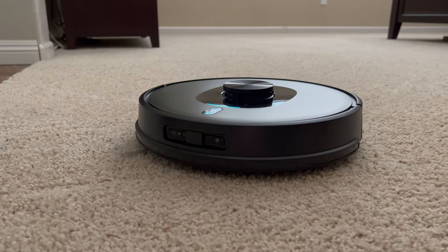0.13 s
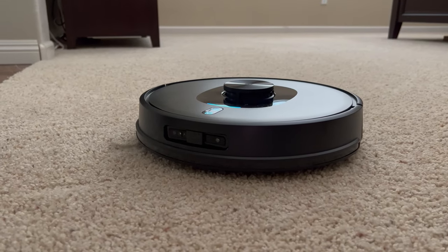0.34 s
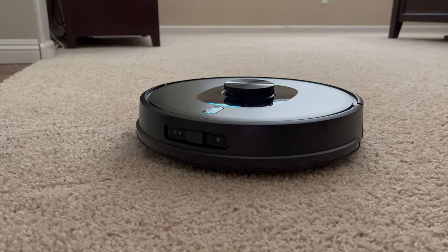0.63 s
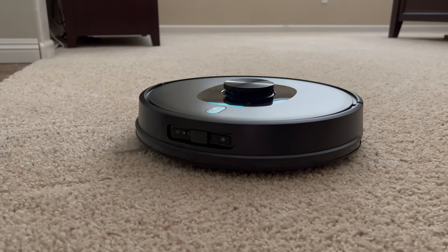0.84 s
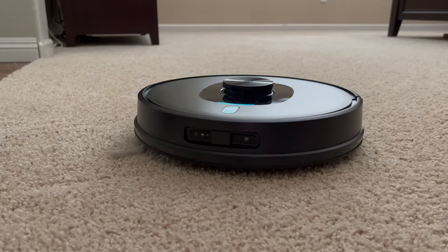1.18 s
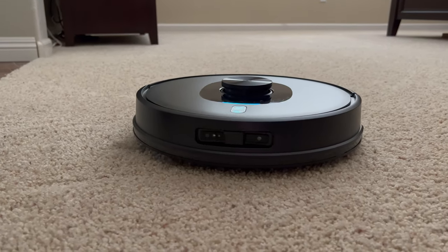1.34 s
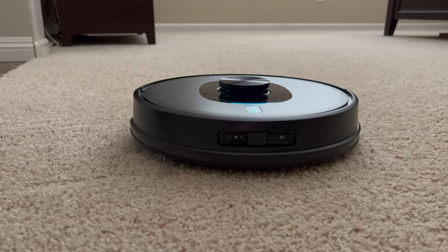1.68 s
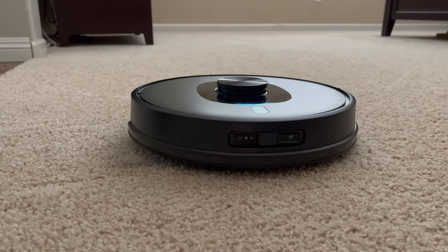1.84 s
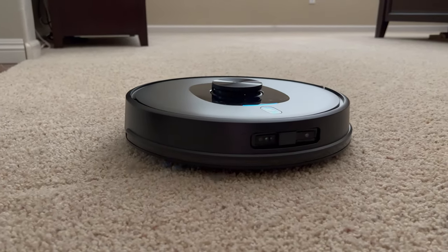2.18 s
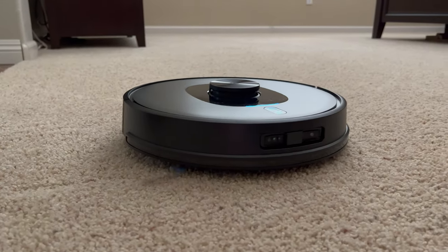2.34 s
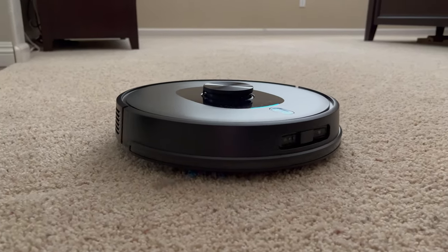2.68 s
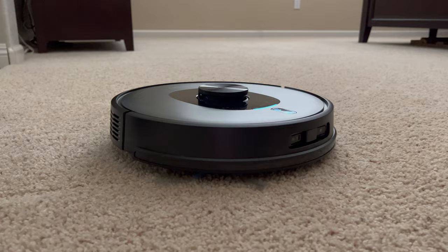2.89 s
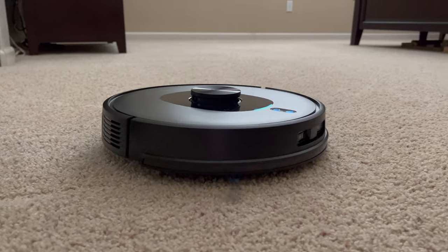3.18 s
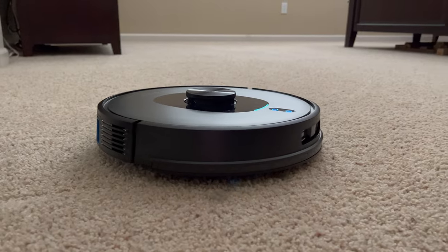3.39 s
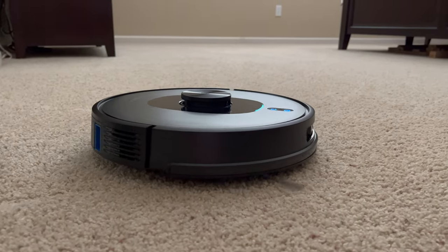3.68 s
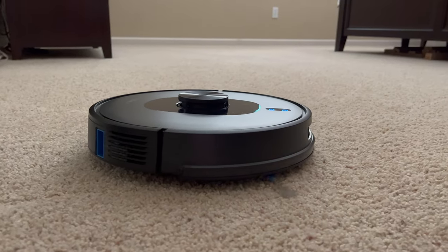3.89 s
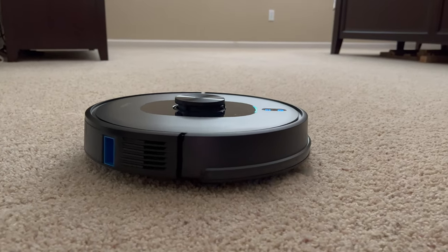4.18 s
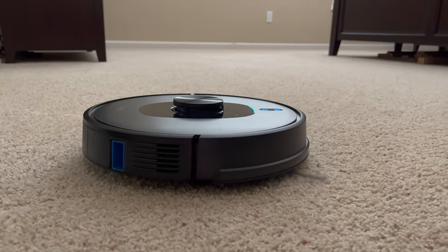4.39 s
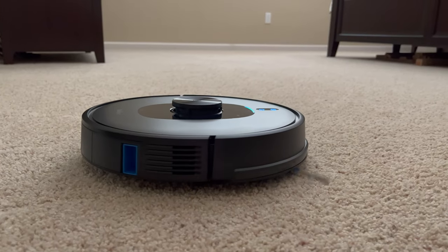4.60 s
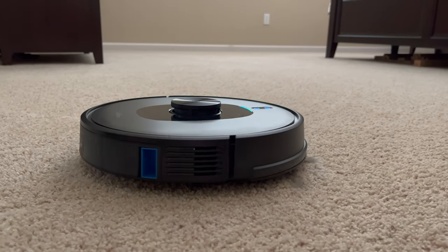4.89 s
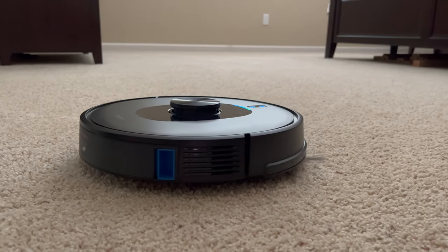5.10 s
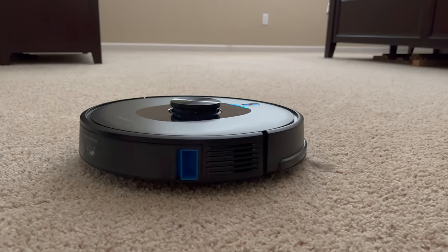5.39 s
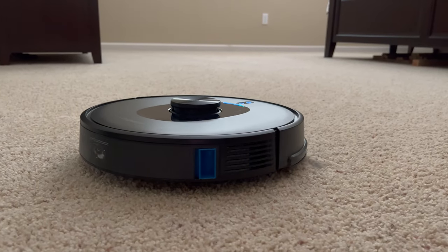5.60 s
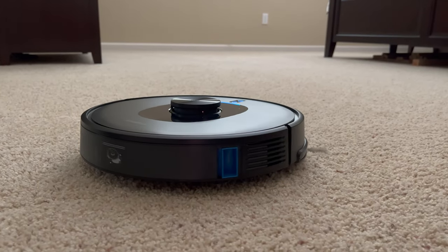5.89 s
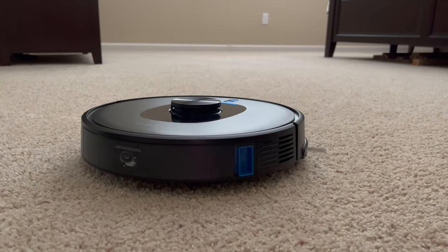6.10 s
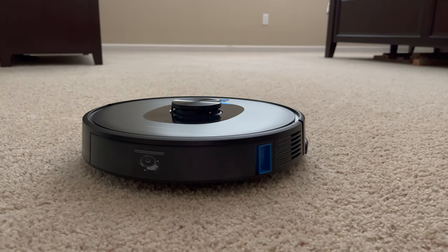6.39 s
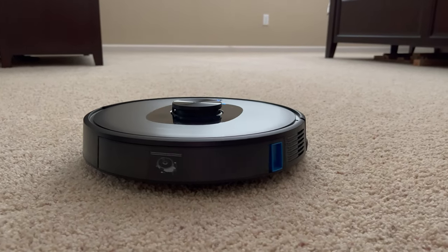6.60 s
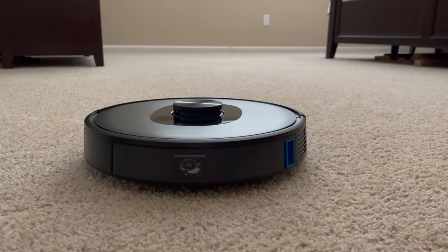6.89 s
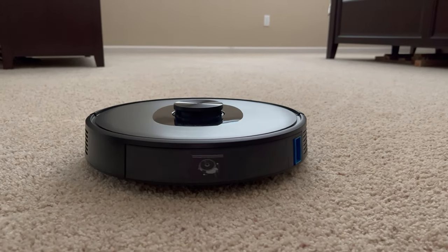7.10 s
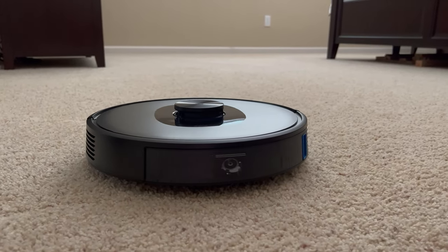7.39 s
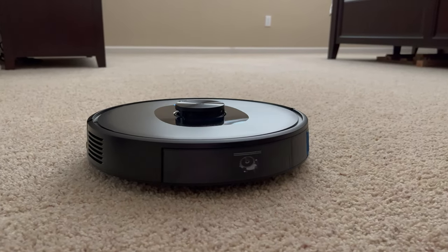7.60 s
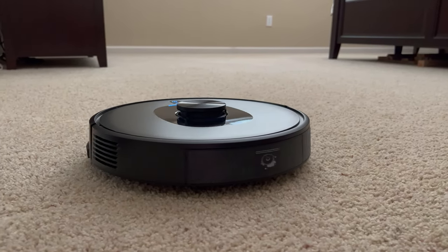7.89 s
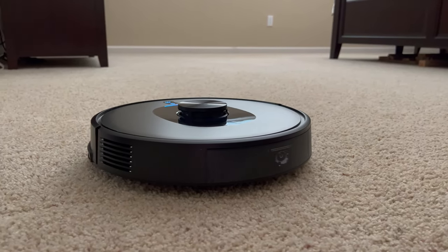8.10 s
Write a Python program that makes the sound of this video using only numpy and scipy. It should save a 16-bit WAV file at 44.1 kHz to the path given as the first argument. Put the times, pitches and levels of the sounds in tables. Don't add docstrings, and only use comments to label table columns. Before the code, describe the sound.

Close stereo pickup of a small vacuum spinning slowly on the spot indoors. Its fan makes constant breathy noise over a low rumbling hum, with a clear high whine near two and a half kilohertz and a fainter octave above. Level stays nearly even at first, the whine wavering subtly, then the airflow becomes fuller and brighter in the last two seconds. No bumps, clicks or stops.

```python
import sys
import numpy as np
from scipy import signal
from scipy.fft import rfft, irfft
from scipy.io import wavfile

SR = 44100
rng = np.random.default_rng(int(sys.argv[2]) if len(sys.argv) > 2 else 0)


def to_wav(s):
    ch = np.atleast_2d(s).T
    pcm = np.round(np.clip(ch, -1, 1) * 32767)
    wavfile.write(sys.argv[1], SR, pcm.astype(np.int16))


def how_loud(loudness_db):
    steps = np.asarray(loudness_db, float) / 20
    return 10 ** steps


N = 363825
HZ = np.fft.rfftfreq(N, 1 / SR) + 1e-3
STEPS = np.arange(0, N + 64, 64)

TURN_START_S, TURN_DEG_PER_S = .9, 37.5
BLADES = 8
HUM_DB = -36
CAVITY_HZ, CAVITY_SAG_HZ = 2417, 280
SAG_AT_DEG, SAG_WIDTH_DEG = 195, 28
ECHO_CUT_HZ = 2000
TOP_HZ = 9550
SHADOW_HZ = 1300
SCATTER_FROM_HZ, SCATTER_RISE_HZ = 190, 120
WALL_FRAMES = 3
FINE_WIDTH, TWIST_WIDTH, BROAD_WIDTH, AWAY_WIDTH = 2.5, 3, 8, 15

# mean, once a turn, at/deg, twice a turn, at/deg
# early path delay after the left direct sound, values in ms
LAGS_MS = [
    (1.3, .24, 0, 0, 0),
    (.026, .117, -143, .068, -87),
    (.022, .23, -160, .046, 89),
    (.43, 0, 0, 0, 0),
    (.824, .079, 151, .042, 3),
    (2.022, .15, -83, .06, -37),
    (2.41, .15, -83, .06, -37),
]
PATH_GAINS = [
    (.55, .08, -120, 0, 0),
    (.68, .33, 70, .15, -20),
    (.16, .12, -170, .1, -5),
    (.6, .38, -125, .08, -21),
    (.25, .15, -168, .15, 3),
    (.45, .15, -140, .05, 62),
    (.22, .25, -140, 0, 0),
]
PAN_DB = (-6, 3, -165, 0.5, 66)
LOW_PAN_DB = (-1, 0.5, 80, 1, -2)
FAN_PER_S = (323.1, .14, 170, 0, 0)

# f/Hz, level/dB
HUM_SPECTRUM = [(13, -57), (22, -38), (48, -12.5), (97, -8.5), (171, 0), (221, -1), (249, -7), (325, -8.5),
                (367, -41.5), (400, -44), (520, -14), (880, -120)]
CASING_SPECTRUM = [(190, -67), (330, -15), (368, -14), (541, -1), (759, -25.5), (1150, -13.5), (1910, -13),
                   (2490, -8.5), (3900, -14), (4830, -19.5), (8160, -22), (10500, -29), (12000, -28),
                   (15700, -28)]
INTAKE_SPECTRUM = [(2600, -5), (3000, 8), (3500, -35), (4000, 20.5), (4400, 3), (5000, 7.5), (5600, -5),
                   (6300, 8), (7400, -67), (8200, -47), (9000, 5), (10200, -20), (12200, 4.5), (15700, -13)]
VENT_SPECTRUM = [(300, -39), (560, 0.5), (760, -1), (1200, -3.5), (1450, 6.5), (1650, -1), (2000, 6),
                 (2600, -8.5), (2900, -7.5), (6900, -11), (8140, -16), (9600, -14.5), (12000, -23.5),
                 (15700, -17.5)]
JET_SPECTRUM = [(6000, -33), (8000, 11), (10000, -5), (12200, 9), (15700, -16)]
# f/Hz, level/dB
DIFFUSE = [(60, -21), (200, -12), (500, -7), (2000, -6.5), (6000, -3.5), (9300, -3), (10300, -11),
           (11500, -17), (15700, -16)]
# f/Hz, width/Hz, lift/dB
ROOM_MODES = [(57.4, 13, 6), (83, 9.5, 3), (158, 9.5, 3), (179.4, 3.5, 6), (227.3, 25, 4), (273, 7.5, 10),
              (347.8, 7.3, 23)]
GRILLE = [(3670, 150, -16), (4535, 63, 7.5), (5500, 480, 7), (7370, 250, -12)]
TOP_DIPS = [(9650, 200, -4), (10400, 900, -5), (14600, 2600, -5)]

SHELL_MS = [.49, .59, .67, .93, 1.07, 1.42, 1.96, 2.68]
SHELL_GAIN = [
    (.1, -0.15, 0.029, 0.0026, -0.072, -0.057, 0.11, -0.27),
    (.15, -0.18, 0.0097, -0.067, -0.015, -0.091, 0.0059, 0.014),
]
# f/Hz, phase/rad
TOP_PHASE = [(9500, -3.0), (10000, -2.7), (10400, -2.0), (10900, -.9), (11900, 0), (12800, .85),
             (13500, 2.05), (14300, 3.14), (15000, 3.5), (15700, 4.45)]

# heading/deg, half width/deg, level/dB
CASING_BEAMS = [(0, 65, -46.5), (150, 1100, -38.5)]
VENT_BEAMS = [(177, 21, -43.5), (260.6, 34.7, -33)]
CAVITY_BEAMS = [(5, 63, -33.5), (101.5, 14, -36), (215, 11, -33.5), (284.5, 27.4, -26)]
DUCT_BEAMS = [(0, 102, -42.5), (172, 39, -41.5), (250, 34, -35)]
INTAKE_BEAMS = [(0, 30, -42.5), (151, 9.1, -49.5)]
JET_BEAMS = [(297, 31, -37)]
FAINT_BEAMS = [(0, 30, 1), (120, 200, -1), (265, 30, 5)]
BLADE_BEAMS = [
    [(5, 18, -53), (84, 17, -55.5), (141, 12, -53.5), (190, 25, -65), (247, 20, -47)],
    [(0, 9, -53), (60, 16, -52), (105, 25, -46.5), (168, 16, -53.5), (228, 12, -48), (262, 22, -46.5)],
]
OCTAVE_BEAMS = [
    [(100, 300, -72), (255, 24, -61)],
    [(0, 12, -55.5), (34, 10, -58.5), (68, 14, -63), (115, 12, -64), (139, 5, -55), (175, 20, -64),
     (220, 15, -58), (258, 28, -52.5)],
]
SHAFT_BEAMS = [
    [(110, 120, -65)],
    [(87, 81, -56.5), (266, 28, -58)],
]
SIXTH_BEAMS = [
    [(120, 200, -66), (240, 14, -51)],
    [(0, 14, -53), (120, 200, -64), (255, 25, -48)],
]
SEVENTH_BEAMS = [
    [(0, 200, -58)],
    [(10, 22, -42), (190, 100, -56)],
]
LEADS = [
    [(0, 2.2), (15, 2.3), (34, 5.1), (65, 5.5), (90, 6.3), (110, 6.3), (135, 7.9), (160, 7.2), (190, 8.8),
     (211, 7.3), (232, 8.3), (265, 7.8)],
    [(0, 1.4), (34, .5), (55, -2), (75, -5), (100, -3.5), (128, -1.7), (140, 0), (157, 2), (172, 4.5),
     (201, 3.4), (243, 0), (264, -1.1)],
]
# multiple of fan speed [1], level/dB
FAINT_ORDERS = [(2, -67), (17, -73), (24, -71.5)]

# heading/deg, half width/deg, f/Hz, slide/(Hz/deg),
# lift/dB
FINE_FRINGES_LEFT = [(51, 45, 470, 1.1, -2.0), (161, 25, 590, -2.0, -4.3), (-1, 49, 780, -2.2, 3.7),
                     (18, 48, 1020, -2.7, -2.7), (106, 30, 1280, 4.0, 5.7), (36, 30, 1290, 1.6, -4.5),
                     (189, 29, 1300, -0.9, -4.3), (243, 23, 1450, 0.4, 3.5), (1, 150, 1520, -1.5, 1.7),
                     (110, 35, 1670, 1.5, -3.5), (242, 28, 1690, -2.7, -3.2), (258, 23, 1860, -2.3, 3.9),
                     (277, 39, 2000, -1.7, -5.4), (20, 29, 2120, -1.3, -3.3), (246, 24, 2170, -5.4, -4.5),
                     (-1, 34, 2370, -2.9, 2.2), (0, 46, 2410, -2.6, 1.5), (109, 23, 2620, 1.6, -5.1),
                     (41, 28, 3100, -2.0, -3.3), (274, 27, 3150, 1.0, -2.0), (254, 13, 3160, -0.2, -4.4),
                     (76, 27, 3280, -5.3, 3.5), (280, 16, 3640, -2.2, 3.4), (190, 48, 3740, 2.6, -3.6),
                     (32, 150, 4120, 0.6, -3.8), (-1, 64, 4560, 2.9, 3.2), (265, 16, 4930, 6.8, 3.5),
                     (248, 66, 5450, 0.9, -5.0), (-1, 19, 5890, 5.5, 3.0), (-1, 16, 6980, 5.6, 3.4),
                     (280, 12, 7130, 12.0, 6.0), (220, 92, 7250, 0.0, 4.0), (-1, 16, 7980, 9.5, 2.3),
                     (-1, 110, 8230, -1.0, 3.2), (172, 71, 8640, -4.1, -2.9), (227, 93, 8840, 0.1, -4.9),
                     (10, 16, 9300, -10.0, 3.0),
                     (275, 14, 6373, 0, 4), (188, 25, 4866, 0, 3.5), (188, 15, 2282, 0, 3),
                    (200, 32, 1162, 0, 2.5), (45, 22, 2583, 0, -3), (200, 25, 660, 0, 2)]
FINE_FRINGES_RIGHT = [(280, 67, 420, -2.5, 3.0), (-1, 67, 470, -0.1, 4.0), (75, 97, 580, -0.8, -4.4),
                      (280, 108, 650, 1.3, -3.1), (267, 14, 680, -0.0, -4.7), (73, 76, 730, -0.4, 2.1),
                      (-1, 17, 750, -0.9, 3.1), (124, 29, 780, -2.3, 6.6), (265, 14, 910, 1.7, 4.7),
                      (111, 130, 1140, 1.3, -3.9), (-1, 12, 1150, 1.5, 2.0), (105, 31, 1300, -0.1, 4.2),
                      (204, 39, 1560, -1.3, 7.7), (280, 60, 1770, 8.2, 3.7), (207, 56, 1850, -3.0, -7.5),
                      (-1, 16, 1930, 10.0, 2.0), (220, 41, 2190, -3.9, 7.9), (83, 54, 2210, 0.4, -2.6),
                      (260, 20, 2260, -3.0, -4.5), (108, 29, 2420, -0.6, 3.0), (85, 109, 2860, -3.2, -2.5),
                      (246, 32, 2990, -4.9, -4.5), (57, 68, 3410, -0.6, 2.0), (132, 59, 3670, -0.5, -3.0),
                      (-1, 16, 3810, -0.4, 3.2), (278, 63, 4010, 4.7, -4.1), (77, 19, 4030, 1.2, 5.0),
                      (65, 61, 4480, 6.0, -4.4), (-1, 13, 4580, -3.5, 4.7), (186, 21, 4740, -3.7, 4.4),
                      (236, 148, 5150, -3.6, 3.0), (273, 19, 5790, -9.0, -3.5), (280, 51, 6790, 3.6, -5.8),
                      (225, 24, 7300, -3.8, 4.8), (-1, 145, 7490, 1.1, -2.8), (-1, 12, 8860, 1.0, -3.8),
                      (210, 42, 9300, 2.3, 3.3),
                      (38, 20, 5469, 0, -4), (275, 18, 8096, 0, -4.5), (102, 18, 4349, 0, -3.5),
                     (118, 22, 1851, 0, 3), (22, 18, 2600, 0, -4), (5, 30, 2760, 0, 3.5)]
BROAD_LOBES_LEFT = [(228, 66, 380, 0.7, 2.4), (99, 27, 620, 0.3, 4.9), (256, 34, 1430, -9.9, -6.6),
                    (-1, 14, 1970, -6.2, 5.1), (99, 40, 2110, 0.1, 4.1), (280, 41, 3270, 7.5, 6.2),
                    (58, 62, 3270, -1.2, 3.0), (-1, 47, 3540, 8.6, 2.3), (56, 71, 5640, -5.9, 1.3),
                    (209, 55, 6100, 0.6, -2.3), (-1, 70, 7380, -12.0, 4.2), (184, 19, 9500, 12.0, 2.7)]
BROAD_LOBES_RIGHT = [(-1, 150, 400, -9.6, 1.5), (239, 36, 730, 1.0, -6.9), (-1, 90, 760, 0.8, 6.1),
                     (-1, 12, 1070, -12.0, 1.9), (147, 31, 1550, 0.7, 4.7), (244, 30, 1640, -5.1, -3.5),
                     (41, 26, 1910, -6.7, -1.9), (-1, 12, 2630, 8.0, 2.9), (208, 18, 7420, 12.0, 3.8),
                     (59, 46, 7570, 5.1, -4.7), (184, 21, 8100, 12.0, -2.8), (-1, 12, 8290, 12.0, 2.0),
                     (-1, 17, 9040, 2.7, 1.7)]
FINE_FRINGES_BOTH = [(85, 35, 15550, 0, 3), (0, 25, 14750, 0, 4), (225, 35, 9320, 0, 2),
                     (265, 22, 3520, 0, -3), (150, 18, 990, 0, -1.5)]
# heading/deg, half width/deg, f/Hz, slide/(Hz/deg), lag/rad
FINE_TWISTS = [(3, 68, 320, -0.3, -0.5), (252, 48, 410, -0.1, -1.3), (0, 34, 410, -0.2, 0.6),
               (-1, 79, 560, -0.6, 1.1), (92, 67, 770, 0.5, -2.1), (177, 44, 770, 4.3, 1.1),
               (280, 24, 790, -2.8, -2.4), (-1, 14, 940, 0.4, -1.0), (33, 89, 1170, 2.2, 1.0),
               (280, 69, 1450, -1.6, -1.7), (9, 17, 1490, -0.2, -2.4), (35, 36, 1560, -3.0, 1.9),
               (146, 17, 1600, 3.8, 2.0), (250, 23, 1720, -2.1, 1.6), (6, 21, 1990, 2.9, -0.7),
               (251, 18, 2170, -9.7, -2.3), (-1, 25, 2230, -0.6, 0.6), (83, 33, 2400, -0.9, -1.5),
               (270, 25, 3000, 0, -.8), (12, 18, 2850, -4.1, 1.0), (214, 58, 2950, -3.8, 1.2),
               (75, 35, 3390, -8.8, -1.6), (80, 18, 3860, -1.2, -2.1), (-1, 14, 3870, -6.1, -1.0),
               (191, 46, 4010, 7.3, 2.2), (56, 36, 6190, 0.6, 3.4), (242, 39, 6390, -1.7, 1.7),
               (18, 21, 7670, 1.7, 3.7), (263, 16, 8390, -10.0, -4.0), (0, 83, 9320, 0.7, 1.8),
               (215, 50, 9960, 0, 1), (85, 32, 15600, 0, 1.1), (270, 12, 15600, 0, .9),
               (110, 70, 10700, 0, -.5), (206, 18, 2411, 0, -1.5), (0, 25, 1670, 0, 1.5),
               (0, 30, 665, 0, 1.6), (270, 20, 3280, 0, 1), (228, 10, 3170, 0, -2.5),
               (140, 22, 765, -1, -1.7)]
BROAD_TWISTS = [(-1, 150, 300, -2.2, -0.8), (228, 150, 300, -6.8, 0.6), (21, 77, 520, 2.2, 0.6),
                (126, 23, 810, -1.9, -2.6), (-1, 62, 860, 1.2, -1.3), (280, 80, 1130, 0.7, -2.9),
                (280, 69, 1750, -6.4, 1.9), (-1, 14, 2140, -0.3, -0.9), (-1, 14, 4560, 10.0, -0.5),
                (141, 30, 4590, 5.0, -0.8), (280, 41, 5130, -10.0, -1.4), (116, 38, 5700, 3.0, 1.3),
                (108, 22, 7410, 3.7, -3.9), (175, 14, 7560, 10.0, 1.5), (231, 24, 7730, 10.0, 3.5),
                (11, 27, 8470, 1.8, -3.7), (50, 21, 8590, -10.0, -3.3)]
# heading/deg, half width/deg, f/Hz, slide/(Hz/deg), mix angle/rad
FACING_AWAY = [(90, 70, 1300, 0, .7), (185, 45, 3100, 0, .9), (75, 65, 5000, 0, 1.0),
               (170, 30, 6000, 0, .6), (80, 65, 6800, 0, .9)]


def heading(samples):
    return TURN_DEG_PER_S * np.maximum(samples / SR - TURN_START_S, 0)


def beams(rows):
    deg = heading(STEPS)
    power = sum(how_loud(2 * db) * np.exp2(-((deg - at) / half) ** 2) for at, half, db in rows)
    return np.interp(np.arange(N), STEPS, np.sqrt(power))


def swing(mean, once, once_at, twice, twice_at):
    deg = heading(STEPS)
    value = mean + once * np.cos(np.radians(deg - once_at))
    value = value + twice * np.cos(2 * np.radians(deg - twice_at))
    return np.interp(np.arange(N), STEPS, value)


def drift(rate_hz):
    r = np.exp(-80 * np.pi * rate_hz / SR)
    slow = signal.lfilter([1], [1, -2 * r, r * r], rng.standard_normal(N // 40 + 2002))[2000:]
    return np.interp(np.arange(N) / 40, np.arange(len(slow)), slow / slow.std())


def shape(points, modes=()):
    hz, level_db = np.transpose(points)
    db = np.interp(np.log(HZ), np.log(hz), level_db)
    for centre_hz, width_hz, lift_db in modes:
        db = db + lift_db / (1 + (2 * (HZ - centre_hz) / width_hz) ** 2)
    return how_loud(db)


def noise(gain):
    coloured = irfft(rfft(rng.standard_normal((3, N))) * gain, N)
    return coloured / coloured.std()


def delay(ms):
    return np.exp(-2j * np.pi * HZ * ms / 1000)


def late(fine, ms):
    return np.interp(4 * (np.arange(N) - ms * SR / 1000), np.arange(4 * N), fine)


def cavity(centre_hz, width_hz):
    band = 1 / (1 + (2 * HZ / width_hz) ** 1.82)
    turn = 2 * np.pi * np.cumsum(centre_hz) / SR
    return noise(band) * np.cos(turn) + noise(band) * np.sin(turn)


def airflow():
    sag = np.exp(-((heading(np.arange(N)) - SAG_AT_DEG) / SAG_WIDTH_DEG) ** 2)
    cavity_hz = CAVITY_HZ - CAVITY_SAG_HZ * sag
    casing = beams(CASING_BEAMS) * how_loud(1.5 + 0.47 * drift(4.6)) * noise(shape(CASING_SPECTRUM))
    intake = beams(INTAKE_BEAMS) * noise(shape(INTAKE_SPECTRUM))
    vent = beams(VENT_BEAMS) * how_loud(6.0 + 1.0 * drift(5.3)) * noise(shape(VENT_SPECTRUM, GRILLE))
    hollow = beams(CAVITY_BEAMS) * how_loud(-6.5 + .8 * drift(11.0)) * cavity(cavity_hz, width_hz=580)
    duct_band = 1 / (1 + ((HZ - 960) / 250) ** 2)
    duct = beams(DUCT_BEAMS) * how_loud(-3.0 + 0.86 * drift(12.0)) * noise(duct_band)
    jet = beams(JET_BEAMS) * noise(shape(JET_SPECTRUM))
    beamed = [[1], [.6], [.6]]
    return casing + hollow + duct + (intake + vent + jet) * beamed


def at_ports(sound):
    air = rfft(sound[0])
    fine = 4 * irfft(air, 4 * N)
    dull = 4 * irfft(air / np.sqrt(1 + (HZ / ECHO_CUT_HZ) ** 2), 4 * N)
    gains = [np.clip(swing(*row), 0, 1.2) for row in PATH_GAINS]
    paths = []
    for lag, gain in zip(LAGS_MS, gains):
        source = dull if lag[0] > 1 else fine
        paths.append(gain * late(source, swing(*lag)))
    left = (sound[0] + paths[0]) / np.sqrt(1 + gains[0] ** 2)
    right = sum(paths[1:]) / np.sqrt(sum(gain ** 2 for gain in gains[1:]))
    shell = 1 + np.array(SHELL_GAIN) @ np.array([delay(ms) for ms in SHELL_MS])

    top = 1 / (1 + (TOP_HZ / HZ) ** 30)
    top_turn = np.exp([0 * HZ, -1j * np.interp(HZ, *np.transpose(TOP_PHASE))])
    near = rfft(np.array([left, right])) * shell * (1 - top) + air * top * top_turn
    heard = near + rfft(sound[1:]) * shape(DIFFUSE)

    bends = 1 / (1 + (HZ / SHADOW_HZ) ** 4)
    side = np.array([[.5], [-.5]])
    low = irfft(heard * bends, N) * how_loud(side * swing(*LOW_PAN_DB))
    middle = irfft(heard * (1 - top - bends), N) * how_loud(side * swing(*PAN_DB))
    return irfft(heard * top, N) + low + middle


def hum():
    low = how_loud(HUM_DB) * noise(shape(HUM_SPECTRUM, ROOM_MODES))
    upper = irfft(rfft(low[0]) * (HZ > 240), N)
    late_upper = irfft(rfft(upper) * delay(0.56), N)
    diffuse = irfft(rfft(low[1:]) * shape(DIFFUSE), N)
    return low[0] + diffuse + upper * [[-.3], [.2]] + late_upper * [[0], [-.3]]


def fringes(sound):
    hz, s, (left, right) = signal.stft(sound, SR, nperseg=2048)
    hz, deg = hz[:, None], heading(s * SR)
    short = np.clip((hz - SCATTER_FROM_HZ) / SCATTER_RISE_HZ, 0, 1)

    def bells(rows, width):
        total = 0
        for at, half, centre, slide, size in rows:
            turned = (deg - at) / half
            detuned = (hz - centre - slide * (deg - at)) / (width * np.sqrt(centre))
            total = total + size * np.exp2(-turned ** 2 - detuned ** 2)
        return short * total

    away = np.minimum(bells(FACING_AWAY, AWAY_WIDTH), np.pi / 2)
    right = np.cos(away) * right + np.sin(away) * np.roll(right, WALL_FRAMES, axis=1)
    lag_rad = bells(FINE_TWISTS, TWIST_WIDTH) + bells(BROAD_TWISTS, BROAD_WIDTH)
    right = right * np.exp(-1j * lag_rad)
    fine_left = FINE_FRINGES_LEFT + FINE_FRINGES_BOTH
    fine_right = FINE_FRINGES_RIGHT + FINE_FRINGES_BOTH
    left = left * how_loud(bells(fine_left, FINE_WIDTH) + bells(BROAD_LOBES_LEFT, BROAD_WIDTH))
    right = right * how_loud(bells(fine_right, FINE_WIDTH) + bells(BROAD_LOBES_RIGHT, BROAD_WIDTH))
    return signal.istft(np.array([left, right]), SR)[1][:, :N]


def fan_tones():
    speed_per_s = swing(*FAN_PER_S) * (1 + .0003 * drift(3.0))
    turn = 2 * np.pi * np.cumsum(speed_per_s) / SR
    deg = heading(np.arange(N))
    blade_lead, octave_lead = [np.interp(deg, *np.transpose(rows)) for rows in LEADS]
    tones = (BLADE_BEAMS, OCTAVE_BEAMS, SHAFT_BEAMS, SIXTH_BEAMS, SEVENTH_BEAMS)
    blade, octave, shaft, sixth, seventh = [np.array([beams(port) for port in tone]) for tone in tones]
    side = np.array([[.5], [-.5]])
    out = blade * how_loud(14.5 + 1.0 * drift(3.2)) * np.sin(BLADES * turn + side * blade_lead)
    octave_phase = 2 * BLADES * turn + side * octave_lead + .4 * drift(9.7)
    out += octave * how_loud(11.5 + 1.8 * drift(10.4)) * np.sin(octave_phase)
    out += shaft * how_loud(14.0) * np.sin(turn + side * 1.5)
    out += sixth * np.sin(6 * turn + side * 1.5)
    out += seventh * np.sin(7 * turn - side * 1.2)
    faint = beams(FAINT_BEAMS)
    for order, level_db in FAINT_ORDERS:
        waver = np.array([drift(0.3), drift(0.13)])
        out += faint * how_loud(level_db + 6 + 2.5 * waver) * np.sin(order * turn + 1.2 * waver)
    return out


def scene():
    return fringes(at_ports(airflow()) + hum()) + fan_tones()


def low_pass(x):
    return signal.sosfilt(signal.butter(12, 15700, fs=SR, output="sos"), x)


def record(dry):
    heard = irfft(rfft(dry) * shape([(20, 0), (20000, 0.0058)], TOP_DIPS), N)
    return low_pass(heard)


dry = scene()
out = record(dry)
to_wav(out)
```